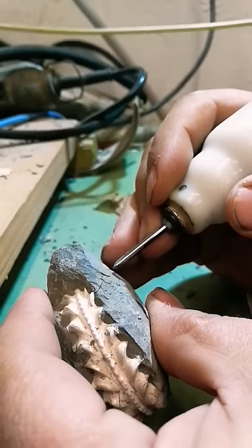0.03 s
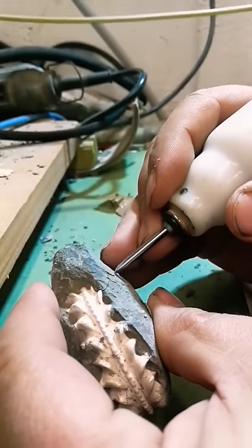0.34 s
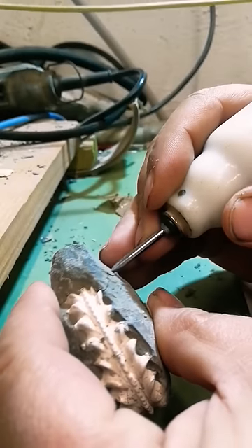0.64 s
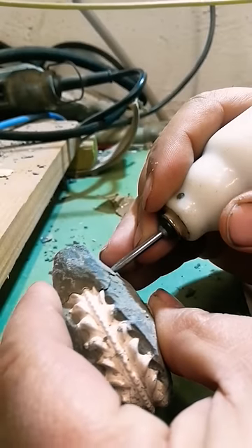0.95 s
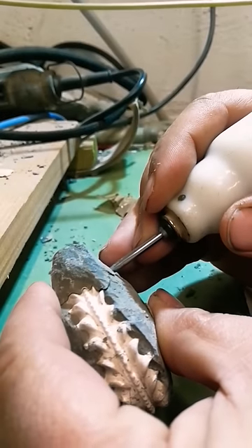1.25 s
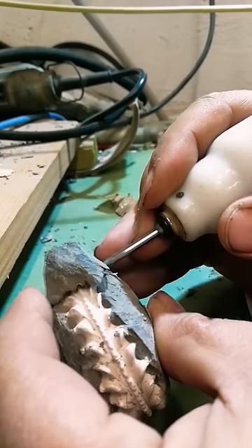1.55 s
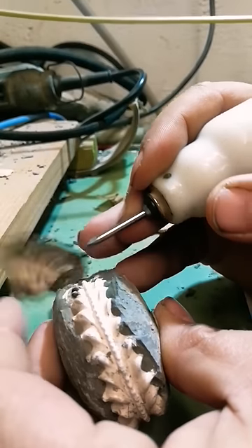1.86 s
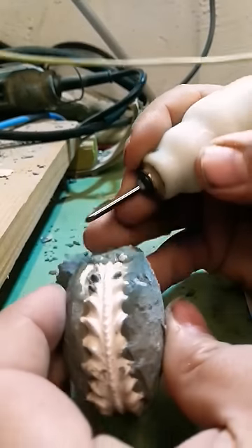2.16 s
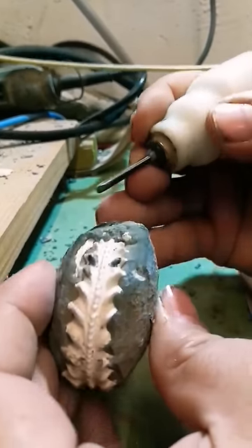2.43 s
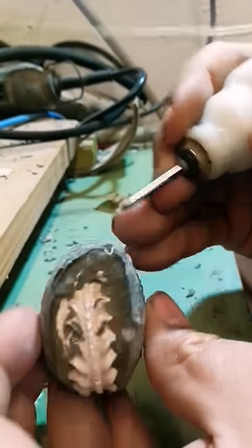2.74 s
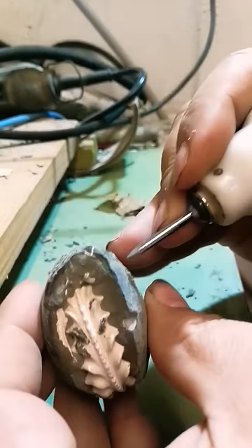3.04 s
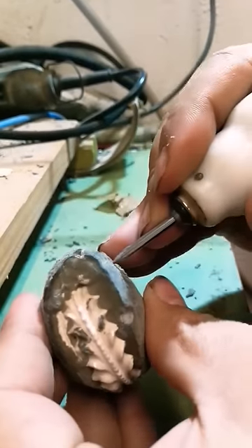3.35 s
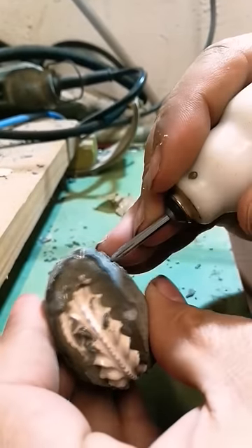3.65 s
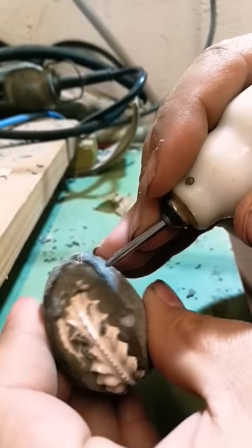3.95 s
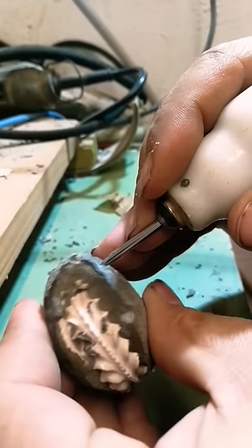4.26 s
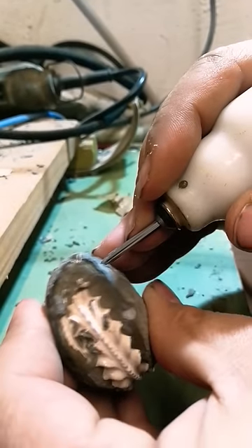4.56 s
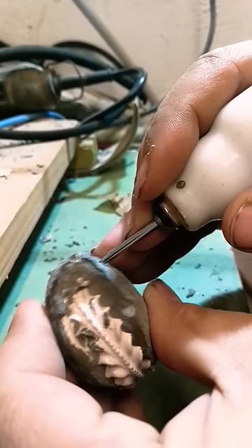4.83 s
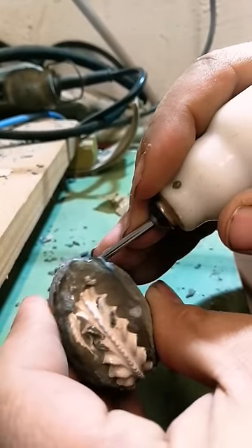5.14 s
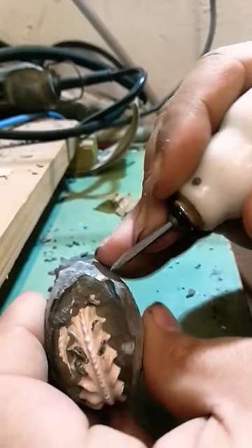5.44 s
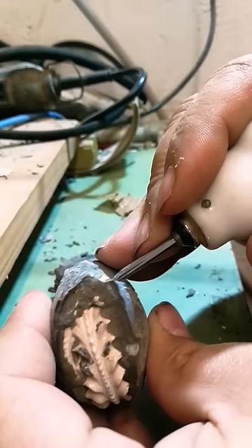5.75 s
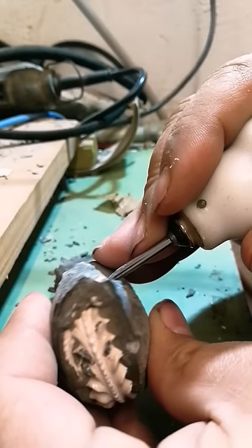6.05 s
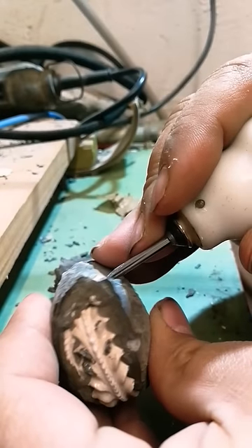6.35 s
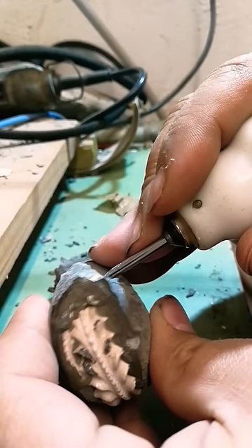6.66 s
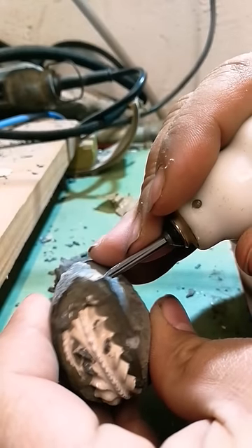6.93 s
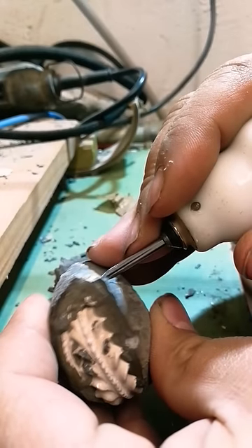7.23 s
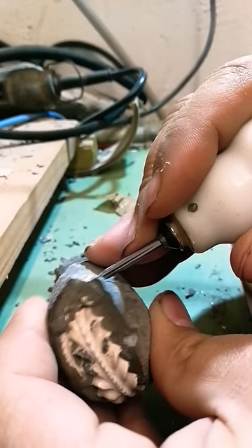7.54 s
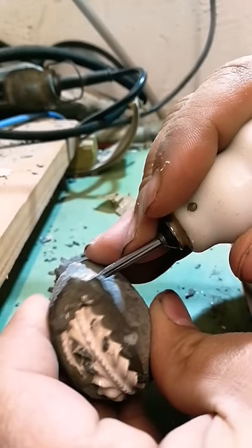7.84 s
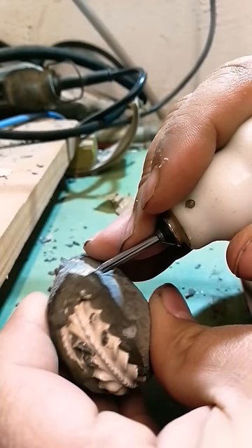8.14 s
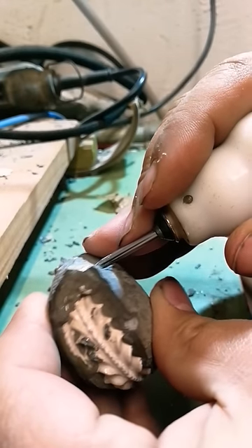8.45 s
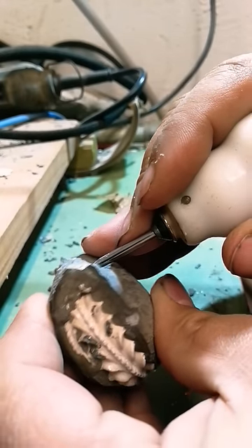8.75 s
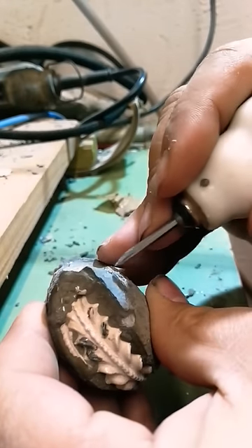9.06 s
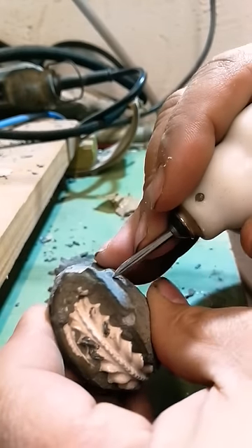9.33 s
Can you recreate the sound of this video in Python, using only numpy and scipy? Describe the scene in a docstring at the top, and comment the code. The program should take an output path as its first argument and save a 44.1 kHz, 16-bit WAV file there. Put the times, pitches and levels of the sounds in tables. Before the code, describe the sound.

Close, bright air hiss and a buzzing hum from a pneumatic pen chiselling stone in spells, with one small knock from a falling chip.

```python
"""A steady hum and a bright hiss: an air-driven engraving pen, close to a stereo microphone pair at a
bench in a small workshop. Its piston strokes about 116 times a second, puffing out exhaust air and
driving a steel stylus that rattles when pressed on a hand-held fossil. Two seconds in, a stone flake
breaks off and bounces on the bench. The hand turns the stone with dull bumps, over low room noise."""
import sys
import numpy as np
from scipy import signal
from scipy.fft import rfft, irfft, next_fast_len
from scipy.io import wavfile

SR = 44100
rng = np.random.default_rng(int(sys.argv[2]) if len(sys.argv) > 2 else 0)


def master_out(mix):
    """Clip the mix to full scale and print it as 16-bit PCM to the path in sys.argv[1]."""
    frames = np.transpose(np.atleast_2d(mix))
    ceiling = np.clip(frames, -1, 1)
    pcm = np.round(ceiling * 32767).astype(np.int16)
    wavfile.write(sys.argv[1], SR, pcm)


N = 418509
TIME = np.arange(N) / SR
FFT_SIZE = next_fast_len(N + SR // 2, real=True)
FFT_SIZE += FFT_SIZE % 2
HZ = np.maximum(np.arange(FFT_SIZE // 2 + 1) * SR / FFT_SIZE, 1)
MIC_LAG_S = .00021  # the pen reaches the right microphone this much later

# stylus pressed on the stone (force 1 = full chiselling):
# start_s, end_s, touch_s, lift_s, first_force, seated_force, seating_s
PRESSES = [(0.407, 1.484, 0.31, 0.15, 0.54, 0.14, 0.84), (1.82, 1.911, 0.093, 0.071, 0.2, 0.23, .1),
           (3.307, 5.043, .2, 0.35, 0.44, 1.195, 1.11), (5.66, 8.971, .17, .12, .36, 1.08, .38),
           (9.195, 9.489, 0.19, .13, 0.49, 0.59, 0.063)]
# the tip digs in (+) or slips (-): centre_s, half_length_s, change_db
TIP_CATCHES = [(0.126, 0.046, -4), (0.238, 0.015, -1.5), (0.8, 0.05, 1.7), (1.167, 0.04, -3.5),
               (1.3, 0.013, -2.5), (1.53, 0.06, -3), (2.01, 0.011, -5), (2.273, 0.039, -5),
               (2.44, 0.045, -5), (3.5, 0.016, 1.2), (3.587, 0.03, -1.7), (3.735, 0.042, 0.5),
               (4.36, 0.03, 0), (4.564, 0.027, -0.3), (4.647, 0.01, 1), (4.915, 0.014, -0.5),
               (4.96, 0.013, 2.5), (5.139, 0.023, -1), (5.972, 0.012, -2), (6.08, 0.014, -0.5),
               (6.14, 0.027, 1.5), (6.204, 0.034, -1.0), (6.338, 0.018, 0.5), (6.488, 0.014, 1.4),
               (6.535, 0.017, -2), (6.597, 0.025, 0.8), (6.721, 0.014, 1.2), (6.828, 0.024, 0),
               (7.073, 0.036, -0.2), (7.227, 0.035, 1), (7.299, 0.013, 2), (7.423, 0.031, -0.7),
               (7.723, 0.011, 1), (7.902, 0.017, 1.5), (8.005, 0.018, 0.5), (8.125, 0.025, -0.5),
               (8.255, 0.015, -2.5), (8.348, 0.03, -0.7), (8.482, 0.021, -2.5), (8.555, 0.024, -1.5),
               (8.639, 0.023, -0.5), (8.739, 0.027, -2.5), (8.774, 0.012, 2.5), (8.849, 0.02, 0),
               (9.374, 0.03, -2)]
# blow and after-knocks within one stroke: delay_s, level_db, looseness_s, scatter_db
STROKE_KNOCKS = [(0, 0, .000016, 1.1), (.0018, -7, .0001, 2.0), (.0044, -11, .00022, 2.0)]
# tone of the blows at each microphone: frequency_hz, left_db, right_db
BLOW_SPECTRUM = [(756, -66, -54), (1160, -81.5, -57.5), (1700, -59.5, -50.5), (2360, -62, -50.5),
                 (3010, -58, -52.5), (4020, -50.5, -51), (5200, -52, -57.5), (6040, -50, -54),
                 (6840, -51, -55.5), (8300, -52, -80), (9460, -47.5, -50), (12500, -51.5, -57),
                 (13200, -57, -92), (14800, -62.5, -57.5)]
# peaks and hollows of the steel shaft and the stone under it:
# pitch_hz, width_hz, left_db, right_db, polarity (1 = sides in step, -1 = opposed)
SHAFT_RESONANCES = [(1870, 38, 3.5, 5, 1), (2670, 55, 4, 1.5, 1), (3070, 130, 5.5, 2, 1),
                    (3360, 90, 4, 2, -1), (3550, 80, 4.5, 3.5, 1), (3680, 70, -8, -6, 1),
                    (4350, 170, 3, 7, 1), (4540, 110, -8, -3, -1), (4880, 95, 6.5, 4, 1),
                    (5350, 170, -3, -4, 1), (6400, 90, 3.5, 3, 1), (6810, 80, 5, 1, 1)]
# peaks and hollows of the pen in the cupped hand: pitch_hz, width_hz, left_db, right_db
PEN_RESONANCES = [(960, 19, -13, -2), (1330, 210, 1.5, 3), (1521, 65, -4, 10), (1663, 213, -2.5, -8.5),
                  (1961, 90, 7.5, 5), (2248, 97, -6.5, -14), (2575, 290, 6.5, 4.5), (2810, 66, -9, -6.5),
                  (3084, 74, 8, 8.5), (4065, 115, -3, -30), (8740, 210, 2.5, -5), (10200, 540, 2, -3),
                  (11350, 180, 3.5, 3), (11620, 350, 3, 3)]
# speed of the unloaded piston, drifting with the air supply: time_s, rate_hz
FREE_STROKE_RATE = [(0.1, 117.4), (2.5, 118.2), (5.5, 117.6), (9.49, 117.2)]
# hum of the exhaust puffs and of the shaking pen: time_s, puff_db, shake_db
HUM_LEVELS = [(0.1, -25.5, -41), (1.93, -25.5, -40.5), (2.06, -23, -38), (2.35, -27, -36.5),
              (3.2, -25, -41), (5.4, -26, -41), (7.7, -25.5, -36.5), (8.9, -26, -37.5), (9.49, -25.5, -49)]
# partials of the puffs, stylus free and pressed: stroke_rate_multiple, free_db, pressed_db
PUFF_HARMONICS = [(2, 0, -1.5), (3, -33, -14.5), (4, -13.5, -11.5), (5, -30, -15), (6, -6.5, -14.5),
                  (7, -14, -12.5), (8, -38, -33)]
# tone of the escaping air at each microphone: frequency_hz, left_db, right_db
EXHAUST_SPECTRUM = [(780, -65.5, -58), (1120, -64, -63), (2680, -62, -60), (3080, -61, -65.5),
                    (3200, -66, -74), (3980, -59.5, -85), (5840, -62, -96), (8660, -56.5, -78),
                    (9720, -53, -100), (11100, -48, -81), (12750, -48, -73), (14000, -51, -63),
                    (14800, -52, -83)]
# gain of three treble bands of the hiss as the hand turns the pen: time_s, lower_db, core_db, sizzle_db
HISS_BANDS = [(0.1, 1.5, -12, 4), (0.4, -1, -10.5, 1.5), (0.8, -1, -7.5, -3.5), (1.3, 0, -11, -1.5),
              (1.55, -1, -9, 0), (1.75, 0, -8, 4.5), (2.0, 4, -11, 4.5), (2.18, 0, -11, 6.5),
              (2.35, 2.5, -13, 5.5), (2.7, 1.5, -7, 4.5), (2.88, 6.5, -5, 1), (3.1, 2.5, -1.5, 0.5),
              (3.45, 2, 1.5, 7.5), (3.85, 2.5, -2.5, -2), (4.3, -3, -2.5, -6), (5.05, -1, -4, -5),
              (5.35, 4.5, -1.5, -7), (5.55, 3, -1, 1), (5.9, 2, -1.5, -2), (6.6, 5.5, -3, -3),
              (7.5, 6, -1.5, -2), (8.4, 3.5, -0.5, 0), (8.9, 6.5, -1.5, -1), (9.15, 0.5, 1, 2),
              (9.48, 1, -2, 8)]
# a band of hiss swells or hollows as the jet sweeps past the fingers: time_s, centre_hz, boost_db
HISS_SWEEP = [(0.1, 14200, -3), (1.1, 13000, 4.5), (1.65, 12400, -0.5), (1.95, 12400, 5), (2.08, 13600, 1),
              (2.18, 14200, 3), (2.3, 14500, -8), (2.6, 14000, -5), (2.72, 12900, -3), (2.85, 12700, -12),
              (3.0, 12360, 1), (3.35, 13170, -1), (4.0, 13300, 7.5), (5.35, 13930, 7), (5.6, 14200, 4.5),
              (6.3, 13860, 4), (8.9, 13540, -1), (9.2, 13700, 3), (9.49, 14980, -8)]
# the flake lands and bounces: start_s, level_db
FLAKE_BOUNCES = [(2.0354, -8), (2.0380, -32), (2.048, -23), (2.111, -21), (2.116, -18)]
# modes of the bench top: pitch_hz, level_db, t60_s
BENCH_RESONANCES = [(285, -13.5, 0.061), (600, -5.5, 0.034), (740, 2.5, 0.02), (905, 8, 0.0048),
                    (1060, 1.5, 0.022), (1400, 2.5, 0.02), (1524, 0, 0.022), (2010, -5.5, 0.027)]
# dull bumps of the hands: centre_s, level_db, half_length_s, low_hz, high_hz
HAND_BUMPS = [(1.956, -38, 0.05, 100, 300), (2.13, -43, 0.13, 130, 332), (2.875, -31.5, 0.021, 160.6, 500),
              (2.901, -28, 0.018, 50, 400), (7.257, -34, 0.017, 65.47, 115),
              (7.652, -41, 0.013, 40.16, 90.1)]
# low background of the workshop: frequency_hz, level_db
ROOM_SPECTRUM = [(20, -73), (45, -69), (75, -65), (160, -65.5), (280, -66.5), (450, -69.5), (800, -74.5),
                 (2000, -100)]


def stylus(strokes, strength_db, hardness_db, skip_db):
    """Steel hammers stone, close up: each knock crushes a little grit and rings pen, shaft and stone."""
    blows = stylus_blows(strokes, strength_db, skip_db)
    load = np.clip(from_db(strength_db), 0, 1)
    grit = .48 * load * dying_noise(blows, decay_s=.00041)
    wash = workshop_tail(blows)  # bridges the gaps between strokes
    impact = blows + cut(grit + wash, 1400, "high")
    # soft stone dulls the blow, and each stroke meets a different grain
    treble_gain = from_db(hardness_db + 1.2 * drift(16))
    impact = impact + (treble_gain - 1) * above(impact, 3540)
    left, right = coloured(impact, in_hz(BLOW_SPECTRUM) + pen_ring_db() - 6.5)
    rattle = shaft_ring(np.array([left, late(right, MIC_LAG_S)]))
    return cut(rattle + cracked_flake(impact[0]), 700, "high")


def stylus_blows(strokes, strength_db, skip_db, jitter_s=.00003):
    """Stereo impulses: one blow a stroke, never exactly on time, and two loose after-knocks."""
    at = np.flatnonzero(np.diff(np.floor(strokes)) > 0)
    strong_weak = from_db(skip_db[at] * (-1) ** np.arange(len(at)))
    pair_rms = np.sqrt((from_db(2 * skip_db[at]) + from_db(-2 * skip_db[at])) / 2)
    blow_size = from_db(strength_db[at]) * strong_weak / pair_rms * np.sqrt(N / len(at))
    landing_s = TIME[at] + jitter_s * rng.standard_normal(len(at))
    blows = np.zeros((2, N))
    for delay_s, level_db, looseness_s, scatter_db in STROKE_KNOCKS:
        chance = rng.standard_normal((len(at), 3))
        sizes = blow_size * from_db(level_db + scatter_db * chance[:, 2])
        for side in range(2):
            blows[side] += clicks(landing_s + delay_s + looseness_s * chance[:, side], sizes)
    return blows


def hand_force():
    """Each press of the stylus sets in, settles to its seated force and lifts off."""
    force = 0
    for start_s, end_s, touch_s, lift_s, first, seated, seating_s in PRESSES:
        age_s = np.maximum(TIME - start_s, 0)
        touching = np.clip(age_s / touch_s, 0, 1) * np.clip(1 - (TIME - end_s) / lift_s, 0, 1)
        force = force + touching * (seated + (first - seated) * np.exp(-age_s / seating_s))
    return np.maximum(force, 0)


def tip_contact(force, bite_force=.65, skip_force=.45, idle_knock=.37):
    """Strength, hardness and strong-weak swing of the blows (all dB) as the hand presses the tip in."""
    catch = tip_catching()
    push = force * from_db(.4 * drift(7))  # hand tremor
    strength = idle_knock + push
    # above the bite force the tip stops skating and the blows brighten
    bite = 1 / (1 + np.exp((bite_force - force * catch) / .13))
    idle_db, skate_db, bite_db = -14, -25.5, 1.05
    treble = from_db(idle_db) + push * from_db(skate_db + bite * (bite_db - skate_db))
    # around the light skip force only every other stroke hits hard
    skip_db = 3.2 * np.exp(-((force - skip_force) / .33) ** 2)
    return 20 * np.log10(strength * catch), 20 * np.log10(treble / strength), skip_db


def tip_catching():
    """Gain on the blows as the tip catches and slips."""
    coarse_s = TIME[::SR // 500]
    change_db = sum(db * bell(coarse_s, centre_s, half_s) for centre_s, half_s, db in TIP_CATCHES)
    return np.interp(TIME, coarse_s, from_db(change_db))


def shaft_ring(sound, swell_db=.9, bend_share=.003, wander_hz=7):
    """Shaft and stone ring after every blow; each peak and hollow swells and bends as the tip walks."""
    for pitch_hz, width_hz, left_db, right_db, polarity in SHAFT_RESONANCES:
        boost_db = np.array([[left_db], [right_db]]) + swell_db * drift(wander_hz)
        boost = from_db(boost_db) * [[1], [polarity]]
        bent_hz = pitch_hz * (1 + bend_share * drift(wander_hz))
        sound = sound + (boost - 1) * resonance(sound, bent_hz, width_hz)
    return sound


def pen_ring_db():
    """Boost from the pen resonating in the cupped hand, at every frequency, left and right."""
    return sum(np.array([[left_db], [right_db]]) / (1 + (2 * (HZ - pitch_hz) / width_hz) ** 2)
               for pitch_hz, width_hz, left_db, right_db in PEN_RESONANCES)


def piston(force, sag_hz=1.15, jitter_share=.0028):
    """Strokes counted since the start; load slows the piston a little."""
    rate_hz = in_time(FREE_STROKE_RATE)[0] - sag_hz * np.tanh(force / .3)
    return np.cumsum(rate_hz * (1 + jitter_share * drift(20))) / SR


def pen_hum(strokes, strength_db):
    """The pen shakes once a stroke and puffs twice; pressing the stylus fills in the odd partials."""
    puff_db, shake_db = in_time(HUM_LEVELS)
    load = np.clip(from_db(strength_db), 0, 1)
    puffs = 0
    for multiple, free_db, pressed_db in PUFF_HARMONICS:
        level_db = puff_db + free_db + load * (pressed_db - free_db) + .5 * drift(16)
        waver_rad = .5 * (multiple / 6) ** 2 * drift(14)  # upper partials waver most
        puffs = puffs + from_db(level_db) * np.cos(2 * np.pi * multiple * strokes + waver_rad)
    shake = from_db(shake_db) * np.cos(2 * np.pi * strokes)
    left, right = np.sqrt(2) * (puffs * from_db([[-2.7], [2.0]]) + shake * from_db([[-1.5], [.7]]))
    return np.array([left, late(right, MIC_LAG_S)])


def exhaust(strokes, flutter_db=.83, correlation=.25):
    """Turbulent air with a spurt at each end of the stroke; its bright jet faces the left microphone."""
    shared, own = rng.standard_normal((2, N))
    right = correlation * late(shared, MIC_LAG_S) + np.sqrt(1 - correlation ** 2) * own
    spurt = .33 * np.exp(-(strokes % 1) / .14)
    return_spurt = .14 * np.exp(-((strokes - .5) % 1) / .016)
    flow = 1 + spurt + return_spurt
    turbulence = np.array([shared, right]) * flow / flow.mean() * from_db(flutter_db * drift(37))
    rush = coloured(turbulence, in_hz(EXHAUST_SPECTRUM) + .87 * pen_ring_db())
    return turning_jet(cut(rush, 900, "high"))


def turning_jet(rush):
    """The top of the hiss shifts as the hand turns the pen and the jet sweeps past the fingers."""
    lower, core, sizzle = from_db(in_time(HISS_BANDS))
    high, higher, top = above(rush, 8530), above(rush, 9950), above(rush, 13070)
    hiss = rush - high + lower * (high - higher) + core * (higher - top) + sizzle * top
    centre_hz, boost_db = in_time(HISS_SWEEP)
    return hiss + (from_db(boost_db) - 1) * resonance(hiss, centre_hz, width_hz=870)


def cracked_flake(impact, pitch_hz=1085):
    """While the tip works at the crack, the loosening flake rings with each blow."""
    drive = impact * from_db(-64.5) * bell(TIME, centre_s=1.5, half_length_s=.7)
    ring = resonance(drive, np.full(N, pitch_hz), width_hz=153)
    return ring * np.sqrt(SR / 2) * from_db([[-3], [2.5]])


def falling_flake():
    """A chip of stone bounces a little right of centre and rings the modes of the bench top."""
    start_s, level_db = np.transpose(FLAKE_BOUNCES)
    hits = clicks(start_s, from_db(level_db))
    bench = 0
    for k, (pitch_hz, mode_db, t60_s) in enumerate(BENCH_RESONANCES):
        fade = from_db(-60 / (t60_s * SR))
        step_rad = 2 * np.pi * pitch_hz / SR
        poles = [1, -2 * fade * np.cos(step_rad), fade * fade]
        ring = signal.lfilter([0, np.sin(step_rad)], poles, hits + 1e-18)
        bench = bench + (-1) ** k * from_db(mode_db) * ring
    direct = bench * from_db([[-1.5], [1.5]])
    return direct + workshop_tail(direct)


def handling():
    """Soft, low bumps a little right of centre as the fingers shift their grip on the stone."""
    bumps = 0
    for centre_s, level_db, half_length_s, low_hz, high_hz in HAND_BUMPS:
        dull_noise = cut(rng.standard_normal(N), high_hz, "low", order=4)
        thud = cut(dull_noise, low_hz, "high", order=4)
        bumps = bumps + from_db(level_db) * thud / thud.std() * bell(TIME, centre_s, half_length_s)
    return bumps * from_db([[-1.5], [1.5]])


def workshop_tail(sound, t60_s=.35):
    """Short diffuse reflections of the small room, different at each microphone and dull on top."""
    age_s = TIME[:SR // 2]
    tail = rng.standard_normal((2, len(age_s))) * from_db(-60 * age_s / t60_s) * (age_s > .003)
    tail /= np.sqrt(np.sum(tail ** 2, axis=1, keepdims=True))
    tail = cut(tail, 10500, "low", order=1)
    return from_db(-5) * signal.fftconvolve(sound, tail, axes=1)[:, :N]


def room_tone():
    """Low workshop noise, partly common to both microphones."""
    common = .37 * cut(rng.standard_normal(N), 74, "high")
    diffuse = 1.19 * rng.standard_normal((2, N))
    return coloured(common + diffuse, in_hz(ROOM_SPECTRUM)) * from_db([[-1.2], [1.2]])


def from_db(db):
    """Decibels to gain."""
    return 10 ** (np.asarray(db) / 20)


def in_time(rows):
    """Each column of a curve at every sample."""
    time_s, *columns = np.transpose(rows)
    return [np.interp(TIME, time_s, column) for column in columns]


def in_hz(rows):
    """Each column of a spectrum at every frequency."""
    hz, *columns = np.transpose(rows)
    return np.array([np.interp(np.log(HZ), np.log(hz), column) for column in columns])


def bell(time_s, centre_s, half_length_s):
    """Gaussian swell that peaks at 1."""
    return np.exp(-.5 * ((time_s - centre_s) / half_length_s) ** 2)


def drift(rate_hz):
    """Slow random wander of spread 1, drawn on a coarse grid."""
    step, count = 32, 2 ** 14
    hz = np.arange(count // 2 + 1) * SR / (step * count)
    slow = irfft(rfft(rng.standard_normal(count)) / (1 + (hz / rate_hz) ** 2))
    return np.interp(np.arange(N) / step, np.arange(count), slow / slow.std())


def clicks(times_s, sizes):
    """One-sample impulses."""
    return np.bincount(np.clip(np.round(times_s * SR).astype(int), 0, N), sizes, N + 1)[:N]


def dying_noise(hits, decay_s):
    """Stereo noise that takes up the energy of each hit and dies away."""
    fade = np.exp(-1 / (decay_s * SR))
    energy = signal.lfilter([1 - fade], [1, -fade], hits ** 2 + 1e-18)
    return np.sqrt(energy) * rng.standard_normal((2, N))


def resonance(x, hz, width_hz):
    """A resonance of gain 1 whose centre may move from sample to sample."""
    turn = np.exp(2j * np.pi * np.cumsum(hz) / SR)
    fade = np.exp(-np.pi * width_hz / SR)
    return 2 * np.real(turn * signal.lfilter([1 - fade], [1, -fade], x * turn.conj()))


def coloured(x, density_db):
    """Causal (minimum-phase) filter that gives white input of rms 1 this density per Hz."""
    cepstrum = irfft(np.log(from_db(density_db) * np.sqrt(SR / 2)), FFT_SIZE)
    cepstrum[..., 1:FFT_SIZE // 2] *= 2
    cepstrum[..., FFT_SIZE // 2 + 1:] = 0
    return irfft(rfft(x, FFT_SIZE) * np.exp(rfft(cepstrum)), FFT_SIZE)[..., :N]


def cut(x, edge_hz, kind, order=2):
    """Butterworth low- or high-pass."""
    return signal.sosfilt(signal.butter(order, edge_hz, kind, fs=SR, output="sos"), x + 1e-18)


def above(x, edge_hz):
    """The part of a sound above a crossover; the rest is x minus this."""
    return irfft(rfft(x, FFT_SIZE) / (1 + (edge_hz / HZ) ** 16), FFT_SIZE)[..., :N]


def late(x, delay_s):
    """The same sound a moment later."""
    return np.interp(TIME - delay_s, TIME, x, left=0)


def scene():
    """At the bench: one piston drives hum, blows and exhaust; pressing slows it and makes the tip bite."""
    force = hand_force()
    strokes = piston(force)
    strength_db, hardness_db, skip_db = tip_contact(force)
    hum = pen_hum(strokes, strength_db)
    rattle = stylus(strokes, strength_db, hardness_db, skip_db)
    return hum + rattle + exhaust(strokes) + falling_flake() + handling() + room_tone()


def record(dry, open_s=.1, fade_s=.016, cutoff_hz=15650):
    """The microphone pair fades in quickly, peaks are rounded off at full scale and the top is cut."""
    opened = dry * np.clip((TIME - open_s) / fade_s + 1, 0, 1)
    rounded = opened / (1 + opened ** 6) ** (1 / 6)
    steep_lowpass = signal.ellip(12, .1, 70, cutoff_hz, fs=SR, output="sos")
    return signal.sosfilt(steep_lowpass, rounded)


dry = scene()
out = record(dry)
master_out(out)
```